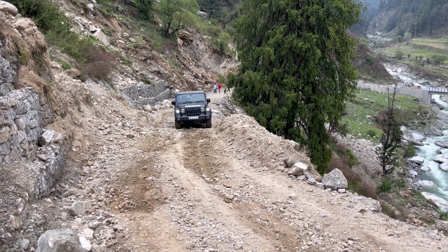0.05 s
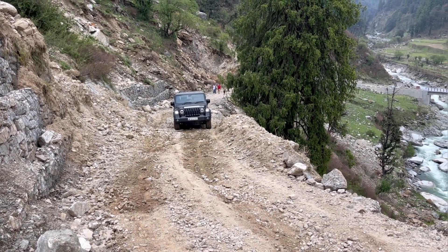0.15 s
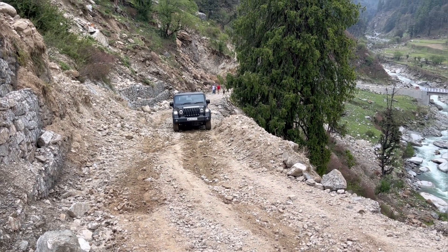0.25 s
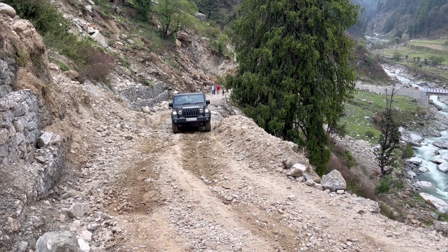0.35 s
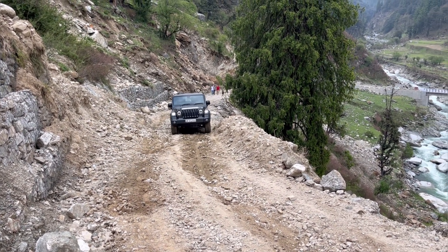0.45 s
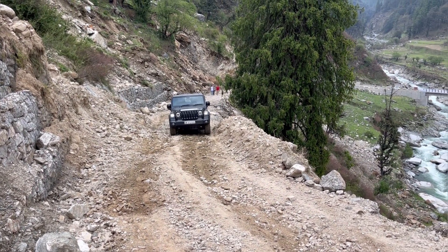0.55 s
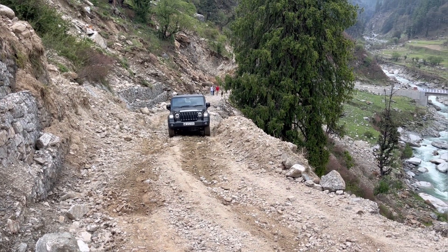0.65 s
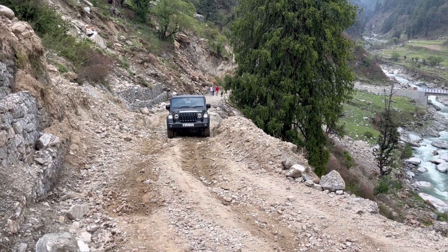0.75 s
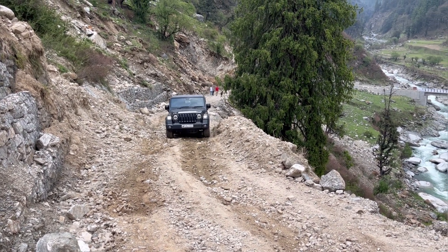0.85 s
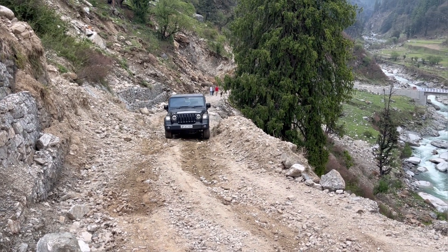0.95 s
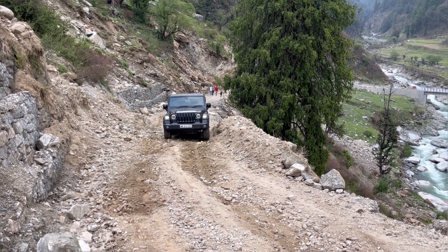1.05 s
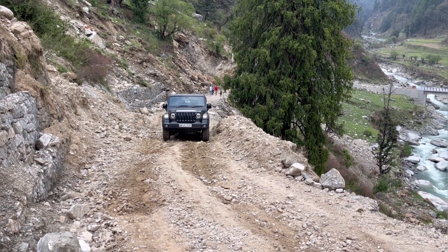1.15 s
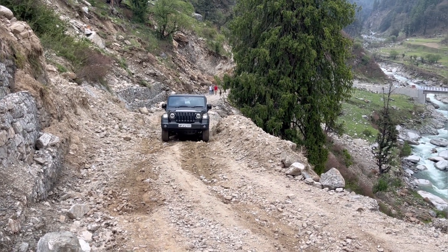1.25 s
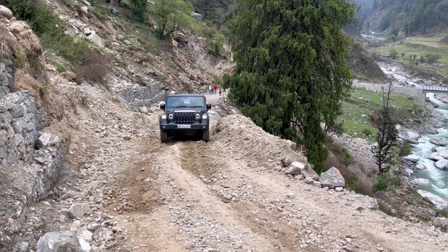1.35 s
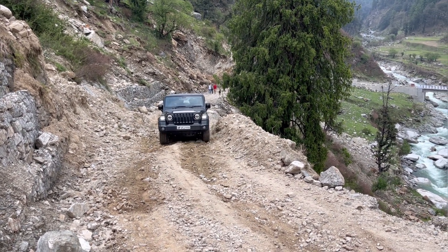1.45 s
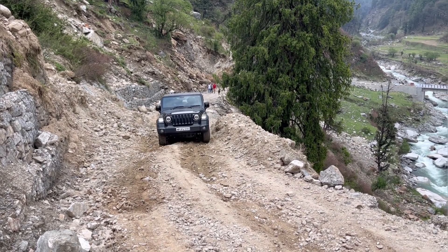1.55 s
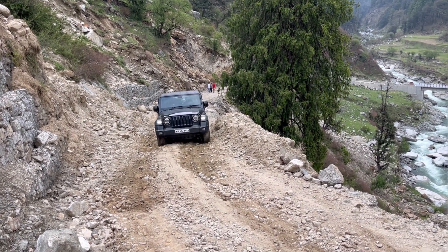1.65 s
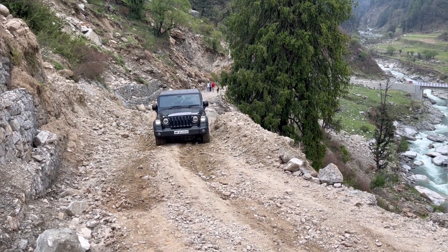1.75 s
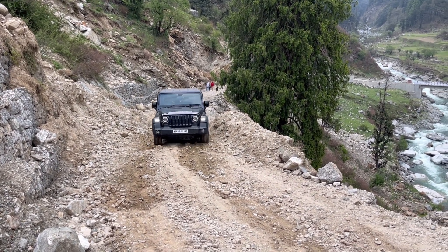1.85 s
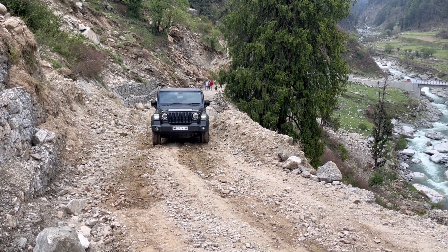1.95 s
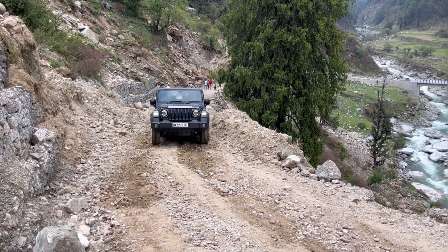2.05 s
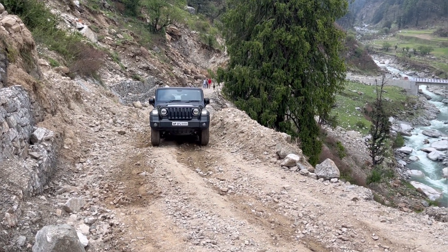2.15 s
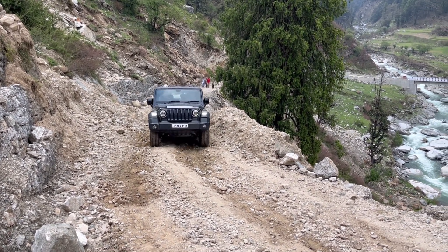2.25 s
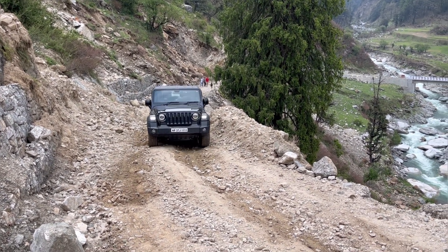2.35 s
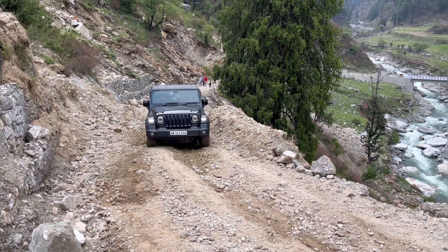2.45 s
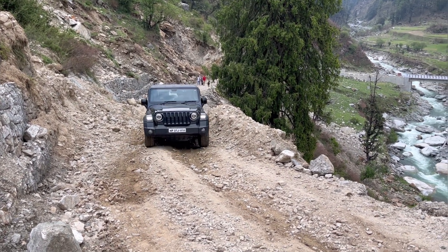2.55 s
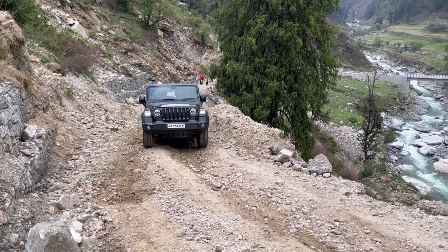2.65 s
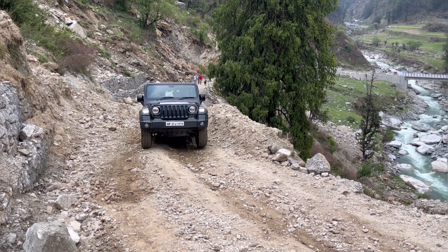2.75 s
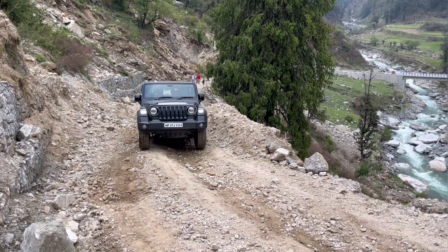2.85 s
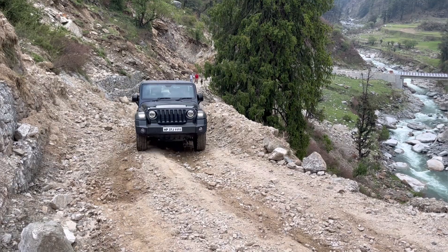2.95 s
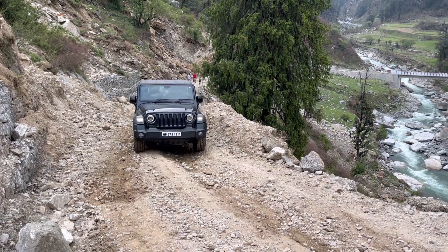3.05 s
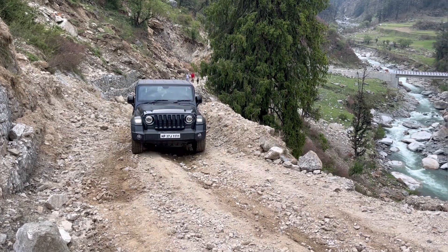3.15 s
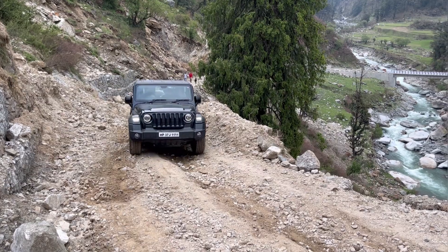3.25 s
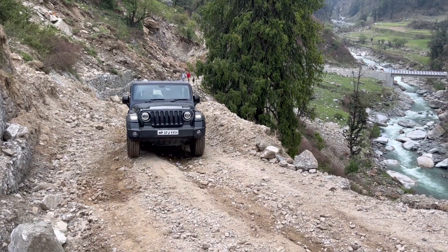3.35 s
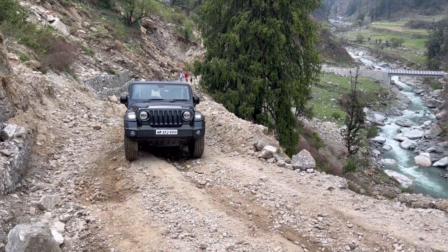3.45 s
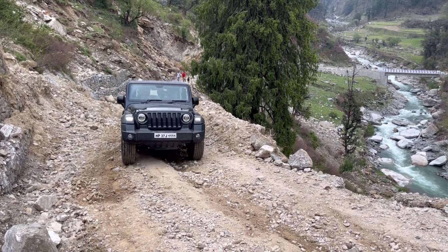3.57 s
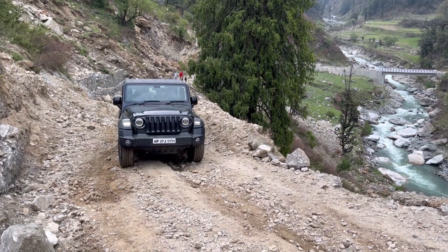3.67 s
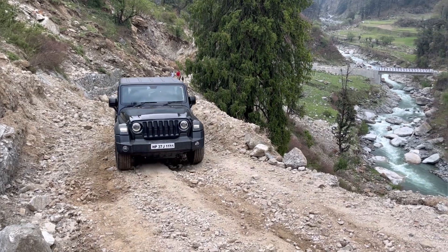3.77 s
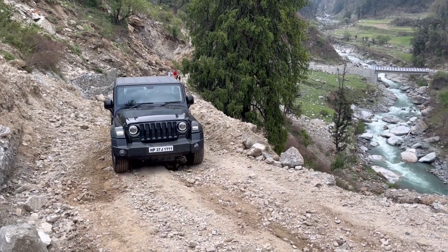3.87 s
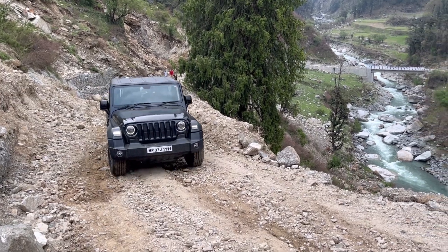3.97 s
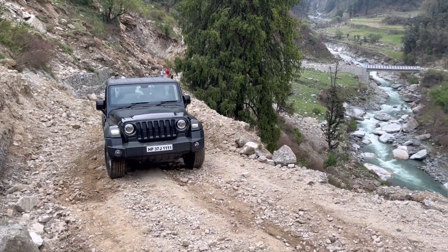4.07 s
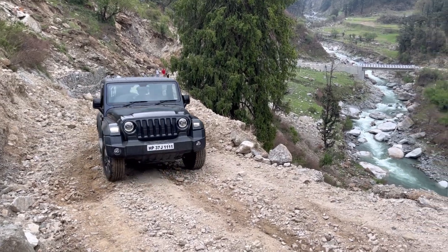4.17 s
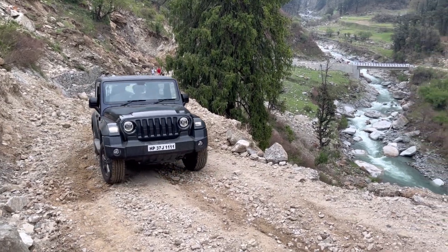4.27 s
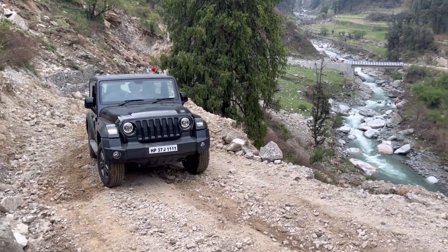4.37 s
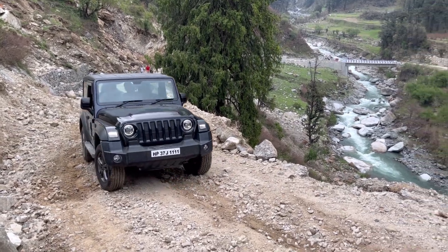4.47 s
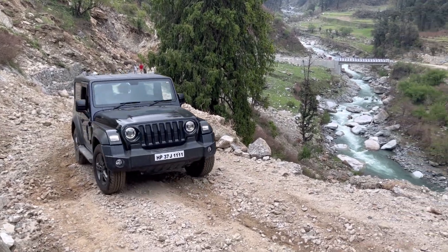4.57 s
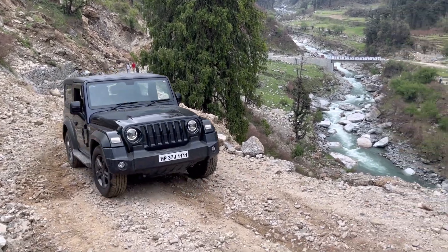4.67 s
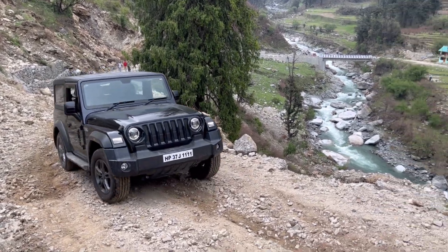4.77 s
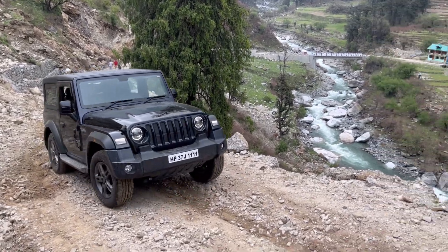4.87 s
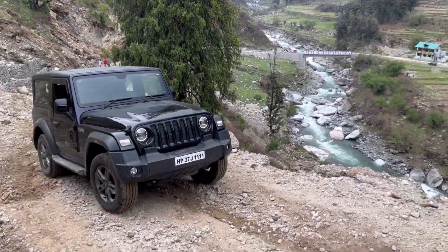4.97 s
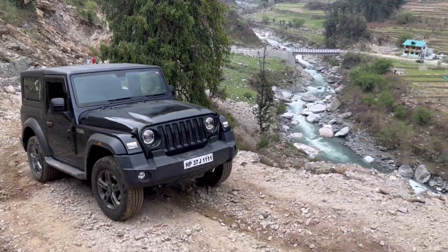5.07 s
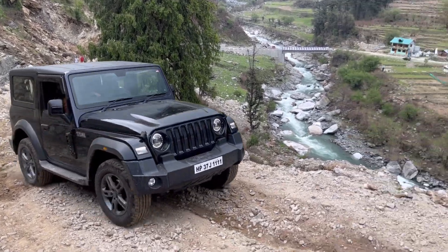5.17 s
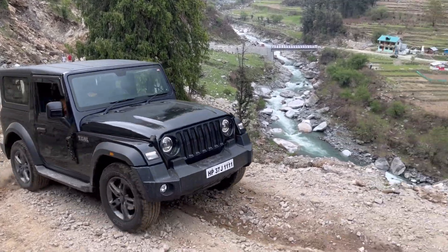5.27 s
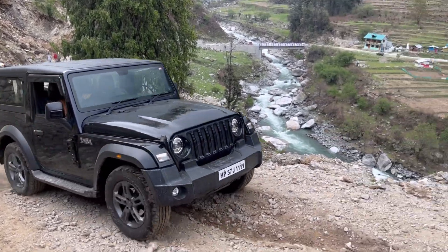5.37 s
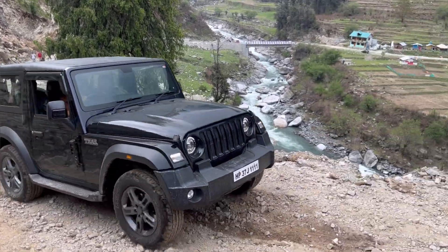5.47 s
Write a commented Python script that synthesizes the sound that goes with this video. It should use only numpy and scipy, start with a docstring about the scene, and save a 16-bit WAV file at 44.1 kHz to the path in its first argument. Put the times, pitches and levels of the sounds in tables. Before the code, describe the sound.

Low engine throb and clatter approach over rough ground beside rushing water, ending in close, dense gravel crunch, hollow stone knocks and sharp pebble snaps.

```python
"""A four-wheel-drive throbs at low revs as it crawls up a stony track towards the listener.
Its engine sums wavering exhaust partials, ringing block clatter, bright injector ticks and a faint turbo whistle.
Coloured showers of tiny impacts make wind and tyre rumble, crunching stones and grit; ringing modes make the
thumps and knocks, and resonant noise bursts the snaps.
A bird slurs once over a rushing river of filtered splashes; two closely spaced microphone ports pick it up."""
import sys
import numpy as np
from scipy import signal
from scipy.fft import rfft, irfft
from scipy.io import wavfile

SR = 44100
rng = np.random.default_rng(int(sys.argv[2]) if len(sys.argv) > 2 else 0)


def master(y):
    """Save y as 16-bit WAV."""
    cut = np.clip(np.atleast_2d(y).T, -1, 1)
    pcm = np.round(cut * 32767)  # scale
    wavfile.write(sys.argv[1], SR, pcm.astype(np.int16))


N = 243431
TIME = np.arange(N) / SR
FREQS = np.maximum(np.arange(N // 2 + 1) * SR / N, 1)

# large stones knocking against a tyre, levels before trim, pitch before random detuning:
# start_s, peak_db, hardness_tilt_db_per_octave, pitch_hz, ring_time_s
KNOCKS = [(0.029, -24.5, -20, 720, 0.075), (2.425, -22.5, 1, 447, 0.014), (2.906, -21.5, -15, 466, 0.031),
          (3.074, -17.5, -11, 439.7, 0.017), (3.108, -23.5, -23, 510, .04), (3.124, -13.5, -3, 454, 0.029),
          (3.144, -22, -26, 540, 0.071), (3.33, -20, -5, 506, 0.034), (3.363, -18.5, -8, 567, .025),
          (3.962, -19, -6, 444, 0.035), (4.036, -17, -8, 455.7, 0.085), (4.097, -18.5, -10, 455, 0.037),
          (4.072, -21, -15, 480, .06), (4.118, -18, -6, 442, 0.048), (4.1895, -11.5, -15, 400, .035),
          (4.352, -22, -12, 590, .03), (4.401, -8.5, -1.5, 452.5, 0.049), (4.411, -12.5, -12, 458.4, 0.033),
          (4.523, -16, -3, 455.5, 0.08), (4.566, -12.5, -12, 473, 0.014), (4.591, -18, -18, 453, 0.051),
          (4.608, -18, -8, 466, 0.066), (4.634, -18.5, -21, 436, 0.03), (4.758, -15, -33, 444, 0.059),
          (4.867, -10, -12, 607, 0.066), (4.882, -8, -2, 494, 0.038), (4.895, -13, -24, 500, 0.036),
          (4.969, -10.5, -4, 380, 0.061), (4.989, -10, -7, 470, 0.069), (5.004, -12, 0, 484, 0.041),
          (5.023, -8.5, -1, 430.5, 0.041), (5.052, -14.5, -14, 520, .06), (5.076, -11, -12, 442.5, 0.061),
          (5.091, -14, -16, 535, 0.057), (5.107, -13, -10, 420, 0.038), (5.117, -11, -12, 525, 0.054),
          (5.18, -12, -8, 525.5, 0.041), (5.192, -11.5, -12, 435.8, 0.045), (5.21, -10.5, -7, 455, 0.052),
          (5.223, -10, -6, 459, 0.11), (5.276, -11.5, -1, 410, 0.038), (5.25, -15, -12, 450, 0.055),
          (5.291, -13, -10, 480, 0.025), (5.312, -11, -6, 573, 0.035), (5.325, -14.5, 7, 456.4, .025),
          (5.348, -20, -10, 480, .05), (5.361, -18, -6, 639.4, .04), (5.396, -12, -15, 482, 0.03),
          (5.406, -13, -5, 526, 0.016), (5.458, -12.5, -14, 405, 0.023), (5.4747, -2.5, -14, 435, 0.029)]
# likeness of the two ports for sounds of the vehicle: frequency_hz, coherence (0-1)
NEAR_LIKENESS = [(60, .99), (200, .96), (600, .92), (850, .75), (1200, .35), (2000, .7), (5000, .65),
                 (7000, .72), (12000, .87)]

# steady approach; the vehicle would draw level at PASSES_S, and levels are given at NEAR_M
SPEED_M_S, PASSES_S, CLEARANCE_M, NEAR_M = 2.85, 5.87, 3.37, 4.1
CRUISE_HZ = 60  # firing rate at which levels are given


def undb(db):
    """Decibels to gain."""
    return 10 ** (np.asarray(db) / 20)


def in_time(table):
    """The columns of a curve at every sample."""
    s, *columns = np.transpose(table)
    return [np.interp(TIME, s, c) for c in columns]


def in_frequency(table, axis=1):
    """One column of a spectrum at every frequency, interpolated over log frequency."""
    rows = np.array(table, float)
    return np.interp(np.log(FREQS), np.log(rows[:, 0]), rows[:, axis])


def colour(x, spectrum):
    """Filter by a spectrum that falls a further 12 dB per octave beyond its ends."""
    low_skirt = np.minimum(FREQS / spectrum[0][0], 1)
    high_skirt = np.minimum(spectrum[-1][0] / FREQS, 1)
    gain = undb(in_frequency(spectrum)) * (low_skirt * high_skirt) ** 2
    return irfft(rfft(x) * gain, N)


def unit(x):
    """Scale to rms 1."""
    return x / np.sqrt(np.mean(x ** 2))


def walk(rate_hz):
    """A smooth random wander of rms 1, mostly slower than the given rate."""
    noise = rfft(rng.standard_normal(N))
    return unit(irfft(noise * np.exp(-(FREQS / rate_hz) ** 2), N))


def spread(pair, likeness):
    """Mix two unrelated sounds into left and right of a given coherence, at rms 1."""
    coherence = np.clip(in_frequency(likeness), 0, .999)
    mid = rfft(pair[0]) * np.sqrt(1 + coherence)
    side = rfft(pair[1]) * np.sqrt(1 - coherence)
    return unit(irfft(np.array([mid + side, mid - side]), N))


def impacts(per_s, scatter_db):
    """Two unrelated showers of tiny impacts; positive scatter makes a few strong, negative a few weak."""
    hit = rng.random((2, N)) < per_s / SR
    size = undb(scatter_db * np.minimum(rng.exponential(size=(2, N)), 4))
    return unit(hit * size * rng.choice([-1, 1], (2, N)))


def add(track, start_s, sound, db):
    """Mix a short sound into a track at a given peak level."""
    i = int(np.clip(start_s * SR, 0, N - 1))
    peaked = undb(db) * sound / np.abs(sound).max()
    track[i:i + len(sound)] += peaked[:N - i]


def remoteness():
    """Distance of the approaching vehicle, in doublings of the near distance."""
    along_m = SPEED_M_S * (TIME - PASSES_S)
    return np.log2(np.hypot(along_m, CLEARANCE_M) / NEAR_M)


def loudness(law, firing_hz):
    """Level of a part in dB: it grows as the vehicle nears and as the revs rise."""
    near_db, distance_db, revs_db = law
    return near_db - distance_db * remoteness() + revs_db * np.log2(firing_hz / CRUISE_HZ)


def exhaust(firing_hz, phase, db, boom_hz, boom_db, smoothing, flutter_db):
    """Exhaust pulses, rounded by the silencer to a few wavering partials that boom near its resonance."""
    # exhaust partials: multiple_of_firing_rate, level_db before boom and flutter
    partials = [(.5, -23), (1, -1), (1.5, -12.5), (2, -8.5), (2.5, -14), (3, -9.5)]

    def boom(hz):
        return boom_db * np.exp(-(np.log(hz / boom_hz) / 0.77) ** 2)

    tone = 0
    for order, part_db in partials:
        if order % 1:  # unequal cylinders add half orders, which fade as the tone grows louder than its median
            part_db = part_db - smoothing * np.maximum(db - np.median(db), 0)
        # the boom is taken relative to the firing tone
        part_db = part_db + boom(order * firing_hz) - boom(firing_hz)
        part_db = part_db + flutter_db * walk(24)
        tone = tone + undb(part_db) * np.sin(2 * np.pi * (order * phase + rng.random()))
    return np.sqrt(2) * tone * undb(db)


def clatter(phase, firing_hz, strain_db, sharpness):
    """Each firing shakes the block with a burst that rings in its resonances; the bonnet muffles the top."""
    # ringing of the engine block and its covers: frequency_hz, width_hz, level_db
    block = [(382, 44, 6), (623, 18, 2), (832, 77, -4), (1266, 144, -11.5), (1450, 83, -19),
             (2230, 1200, -20.5), (3710, 300, -22), (4440, 100, -21)]
    # clatter loudness: near_level_db at cruise, loss_db per distance doubling, gain_db per revs doubling
    clatter_law = (-38, 5.17, 13.5)
    bursts = impacts(per_s=6000, scatter_db=2.5) * np.exp(sharpness * np.cos(2 * np.pi * phase))
    ring = 0
    for hz, width_hz, mode_db in block:
        b, a = signal.iirpeak(hz, hz / width_hz, fs=SR)
        ring = ring + undb(mode_db) * signal.lfilter(b, a, bursts)
    muffled = colour(ring, [(250, 0), (4000, 0)])
    return spread(muffled, NEAR_LIKENESS) * undb(loudness(clatter_law, firing_hz) + strain_db)


def injectors(phase, decay_cycles, uneven_db):
    """Injectors tick as bright noise that jumps up and decays at each firing, at a wandering strength."""
    # level of the ticking: time_s, level_db
    ticking = [(0, -59), (1.3, -54.5), (1.9, -73), (2.3, -70), (2.45, -50.5), (3.2, -58.5), (4.1, -49),
               (5.52, -49)]
    # ringing of the injectors: frequency_hz, density_db per Hz
    injector_spectrum = [(2900, -9), (3300, -0.5), (3650, -2.5), (4100, -11), (5900, -22), (6500, -7),
                         (7200, -25)]
    level_db, = in_time(ticking)
    decay = np.exp(-(phase % 1) / decay_cycles)
    ticks = rng.standard_normal((2, N)) * decay * undb(uneven_db * walk(46))
    return spread(colour(ticks, injector_spectrum), NEAR_LIKENESS) * undb(level_db)


def whistle(table, waver, flicker_db):
    """A gliding sine, unsteady in pitch and level, silent outside its table."""
    hz, db = in_time(table)
    sounding = (TIME > table[0][0]) & (TIME < table[-1][0])
    cycles = np.cumsum(hz * (1 + waver * walk(202.6))) / SR
    return sounding * undb(db + flicker_db * walk(14)) * np.sin(2 * np.pi * cycles)


def turbo():
    """The turbocharger's faint whistle drifts in pitch."""
    # whistle before waver and flicker: time_s, pitch_hz, level_db
    turbo_glide = [(1.3, 11600, -80), (1.47, 11680, -72), (1.6, 11400, -79), (1.75, 11950, -80),
                   (1.88, 11620, -71), (2.05, 11720, -75), (2.27, 11130, -70.5), (2.42, 10880, -69.5),
                   (2.6, 11200, -76), (2.8, 12000, -86), (3.2, 13300, -75), (3.6, 13980, -85)]
    return whistle(turbo_glide, waver=.006, flicker_db=3.5)


def rumble(phase, firing_hz, strain_db, throb):
    """Gusting wind and dull jolts of tyres and body share one noise, shaken a little at each firing."""
    # rumble colour: frequency_hz, density_db per Hz
    rumble_spectrum = [(25, -10), (42, -5.5), (60, -2), (85, 5.5), (125, -6.5), (160, -3.5), (250, -14),
                       (370, -9), (480, -41), (900, -39)]
    # tyre loudness: near_level_db at cruise, loss_db per distance doubling, gain_db per revs doubling
    tyre_law = (-28, 5.1, 10.7)
    wind_db, gust_db = -40, 4.5
    tyre_db = loudness(tyre_law, firing_hz) + strain_db
    gain = np.hypot(undb(wind_db + gust_db * walk(6.2)), undb(tyre_db))
    jolts = impacts(per_s=900, scatter_db=2.5) * (1 + throb * np.cos(2 * np.pi * phase))
    return spread(colour(jolts, rumble_spectrum), NEAR_LIKENESS) * gain


def blow(modes, tilt_db, scrape, scrape_s):
    """A push and a short scrape ring modes of alternating sign; a harder contact lifts the upper ones."""
    t = TIME[:SR // 6]
    ring = 0
    for k, (hz, db, t60) in enumerate(modes):
        weight_db = db + tilt_db * np.log2(hz / modes[0][0]) + 0.5 * rng.standard_normal()
        detuned_hz = hz * (1 + 0.027 * rng.standard_normal())
        envelope = undb(weight_db - 60 * t / t60)
        ring = ring + (-1) ** k * envelope * np.sin(2 * np.pi * detuned_hz * t)
    push = scrape * rng.standard_normal(len(t)) * np.exp(-t / scrape_s)
    push[0] = 1
    return signal.fftconvolve(ring, push)[:len(t)]


def thumps(trim_db):
    """A wheel drops off a rock: tyre and body boom, deeper when the landing is soft."""
    # suspension jolts, levels before trim and bass cut: start_s, peak_db, hardness_tilt_db_per_octave
    landings = [(0.83, -25, -9), (0.869, -23.5, 18), (1.311, -21.5, 6), (1.683, -20, -3.5),
                (2.155, -16.5, -3), (2.285, -18, -25), (2.463, -23, -30), (2.651, -28, 27),
                (2.903, -21, -21), (3.011, -24, -5), (3.234, -27, 16), (3.335, -16.5, -10),
                (3.358, -27, -4), (4.191, -14, -2), (4.199, -19, 8), (4.21, -13, -13), (4.291, -22, -13),
                (4.902, -18, -8), (5.11, -16, -8), (5.217, -12.5, -2.5)]
    # modes of the body before random detuning: frequency_hz, level_db, t60_s
    body_modes = [(84, -1, 0.11), (148, -1, 0.08), (206, 0, 0.055), (290, 0, 0.065), (389, -4, 0.035)]
    out = np.zeros(N)
    for s, db, tilt_db in landings:
        add(out, s, blow(body_modes, tilt_db, scrape=0.03, scrape_s=0.0081), db + trim_db)
    # the lowest bass is cut away
    return signal.sosfilt(signal.butter(2, 55, "high", fs=SR, output="sos"), out)


def stirred(stir_db):
    """Gain of the ground's unrest, which swells into each knock and settles after it."""
    rise_s, settle_s = .006, .048
    gain = 0
    for s, db, *_ in KNOCKS:
        fade = np.maximum((s - TIME) / rise_s, (TIME - s) / settle_s)
        gain = gain + undb(db + stir_db) * np.exp(-fade)
    return gain


def sprayed():
    """Gain of the grit thrown by a slipping tread, which swells and dies away at each slip."""
    # sprays of grit: centre_s, level_db, length_s
    sprays = [(2.47, -59, 0.032), (3.33, -43.5, 0.032), (4.42, -53, 0.029), (4.611, -43, 0.011),
              (5.192, -38, 0.034)]
    return sum(undb(db) * np.exp(-((TIME - s) / length_s) ** 2) for s, db, length_s in sprays)


def gravel(crunch_db, crackle_db, patchy_db, grit_patchy_db):
    """Stones crunch unevenly while fine grit crackles between them; each knock stirs both."""
    # colour of the grinding stones: frequency_hz, density_db per Hz
    stone_spectrum = [(180, 2), (320, -2), (430, 0), (520, -1.5), (620, 4), (740, -1.5), (820, -2),
                      (1100, -20.5), (1400, -32), (3000, -35)]
    # colour of the fine grit: frequency_hz, density_db per Hz
    grit_spectrum = [(1100, 4.5), (1400, -6), (1700, 2), (2850, -3), (3300, -9), (3680, -3.5), (4000, -8.5),
                     (4400, -13), (4900, -8), (5500, -12), (7400, -9.5), (9300, -15.5), (11700, -15.5),
                     (14000, -28)]
    stones = spread(colour(impacts(per_s=380, scatter_db=-1.0), stone_spectrum), NEAR_LIKENESS)
    grit = spread(colour(impacts(per_s=4000, scatter_db=-1.0), grit_spectrum), NEAR_LIKENESS)
    # stirring levels are relative to the knocks as listed
    crunch = np.hypot(undb(crunch_db + patchy_db * walk(35)), stirred(stir_db=-22))
    crackle = np.hypot(undb(crackle_db + grit_patchy_db * walk(82)), stirred(stir_db=-35.5) + sprayed())
    return stones * crunch + grit * crackle


def knock(tilt_db, hz, ring_s):
    """One stone against the tread: its size sets the pitch, the grip of the rubber how long it rings."""
    # hollow ring of tyre and wheel arch, rescaled to each stone: frequency_hz, level_db, t60_s
    wheel_modes = [(446.5, 2.5, 0.034), (579, -2.5, 0.04), (790, -4, 0.05), (1119, -3.5, 0.045),
                   (1280, -12, 0.025), (1700, -20.5, 0.02)]
    lowest_hz, _, lowest_t60 = wheel_modes[0]
    modes = [(f * hz / lowest_hz, db, t60 * ring_s / lowest_t60) for f, db, t60 in wheel_modes]
    return blow(modes, tilt_db, scrape=.018, scrape_s=.18 * ring_s)


def knocks(trim_db):
    """Large stones tip under the tread and knock hollowly."""
    out = np.zeros(N)
    for s, db, tilt_db, hz, ring_s in KNOCKS:
        add(out, s, knock(tilt_db, hz, ring_s), db + trim_db)
    return out


def loose_stones(crunch_db):
    """Further stones of mixed size tip under the treads at random, with a common short ring, their levels
    following the crunch."""
    per_s, over_crunch_db, scatter_db = 32, 1.5, -14
    out = np.zeros(N)
    for when, size, hardness, pitch in rng.random((int(per_s * N / SR), 4)):
        i = int(when * N)
        sound = knock(-12 * hardness, hz=390 + 150 * pitch, ring_s=0.026)
        add(out, TIME[i], sound, crunch_db[i] + over_crunch_db + scatter_db * (2 * size - 1))
    return out


def snap(hz, decay_s, width):
    """A brief noise crack rings at the pebble's own pitch; width is a fraction of that pitch."""
    t = TIME[:SR // 30]
    crack = rng.standard_normal(len(t)) * t * np.exp(-t / decay_s)
    b, a = signal.iirpeak(hz, 1 / width, fs=SR)
    return signal.lfilter(b, a, signal.lfilter(b, a, crack))


def snaps(trim_db):
    """Pinched pebbles crack against each other."""
    # pebbles snapping, levels before trim: start_s, peak_db, pitch_hz
    pebbles = [(4.605, -34, 2400), (4.949, -30, 1714), (4.975, -26, 1650), (5.004, -24, 1710),
               (5.028, -25, 2050), (5.119, -29, 1650), (5.19, -32, 1930), (5.191, -19, 6270),
               (5.197, -29, 5200), (5.226, -31, 2100), (5.267, -22, 1780), (5.279, -23, 1897),
               (5.281, -26, 6440), (5.313, -25, 2090), (5.396, -37, 1797), (5.443, -14, 2380),
               (5.447, -21, 2700), (5.470, -16.5, 1900), (5.472, -20, 6900), (5.472, -34, 5030),
               (5.474, -24, 3340)]
    out = np.zeros(N)
    for s, db, hz in pebbles:
        add(out, s, snap(hz, decay_s=0.00098, width=0.43), db + trim_db)
    return out


def chips(grit_db):
    """Chips of stone crack thickly at random under the treads, their levels following the grit."""
    per_s, over_grit_db, scatter_db = 270, 0.5, -2.5
    low_hz, high_hz = 1590, 3940
    out = np.zeros(N)
    for when, size, pitch in rng.random((int(per_s * N / SR), 3)):
        i = int(when * N)
        sound = snap(low_hz * (high_hz / low_hz) ** pitch, decay_s=0.00073, width=0.63)
        add(out, TIME[i], sound, grit_db[i] + over_grit_db + scatter_db * (2 * size - 1))
    return out


def bird():
    """One bird call slurs quickly downwards."""
    # slur before waver and flicker: time_s, pitch_hz, level_db
    slur = [(3.40, 7020, -63), (3.412, 6210, -51), (3.425, 5140, -49.5), (3.445, 4300, -51),
            (3.465, 3780, -53), (3.48, 3600, -80)]
    return whistle(slur, waver=.012, flicker_db=1.5)


def river(level_db, surge_db, flicker_db):
    """White water far below: countless splashes; the whole surges slightly and each octave flickers alone."""
    # colour of the water: frequency_hz, density_db per Hz
    water_spectrum = [(150, 1), (370, -4), (500, -8.5), (1000, -12), (1550, -10.5), (2200, -19),
                      (2850, -21), (3150, -22), (3480, -20.5), (3850, -25.5), (4300, -26.5), (6000, -30),
                      (8700, -32), (10000, -35), (11700, -42.5), (14000, -56)]
    # likeness of the two ports for the river: frequency_hz, coherence (0-1)
    far_likeness = [(150, 0.89), (400, 0.68), (600, 0.15), (1200, 0.0084), (2300, 0.18), (3400, 0.15),
                    (5500, 0.13), (8000, 1), (12000, 1)]
    water = rfft(colour(impacts(per_s=12000, scatter_db=2.5), water_spectrum))
    octave = np.clip(np.log2(FREQS / water_spectrum[0][0]), 0, 6)
    flickering = 0
    for k in range(7):
        overlap = np.maximum(1 - np.abs(octave - k), 0)  # neighbouring bands crossfade
        flickering = flickering + irfft(water * overlap, N) * undb(flicker_db * walk(29))
    return spread(flickering * undb(surge_db * walk(17.0)), far_likeness) * undb(level_db)


def scene():
    """The vehicle and its wheels draw near over the steady river."""
    # engine: time_s, firing_rate_hz before its small wander, firing_tone_strength_db near by
    engine_course = [(0, 73.6, -22), (.05, 70.8, -16.5), (.14, 69.04, -31), (.33, 67, -23.5),
                     (.53, 66.5, -18), (.75, 66.3, -27.5), (1.1, 65.9, -28), (1.25, 74.55, -21.5),
                     (1.42, 64.06, -20), (1.58, 53.44, -23.5), (2.04, 53.03, -27.5), (2.38, 43.65, -38),
                     (2.72, 45.43, -31.5), (3.52, 46.55, -30.5), (3.78, 40.7, -36.5), (3.98, 49.1, -29),
                     (4.42, 53.58, -29.5), (4.65, 61.06, -24), (4.8, 66.4, -19), (4.84, 66.8, -32),
                     (4.93, 73.84, -21.5), (5.06, 75.95, -24), (5.18, 81.1, -20), (5.34, 80.3, -19),
                     (5.45, 75, -17), (5.52, 70.6, -21)]
    # strain of the climb, which lifts clatter and tyre rumble together: time_s, lift_db
    strain = [(0, -1), (.6, 1.5), (1.3, 2.5), (2.0, 4), (2.6, -3.5), (3.2, 4), (3.8, 0), (5.52, -1.5)]
    # crunch loudness: near_level_db at cruise, loss_db per distance doubling, gain_db per revs doubling
    crunch_law = (-34, 7.15, 2.8)
    # grit loudness: near_level_db at cruise, loss_db per distance doubling, gain_db per revs doubling
    grit_law = (-38.5, 10.9, 0.44)
    firing_hz, effort_db = in_time(engine_course)
    strain_db, = in_time(strain)
    phase = np.cumsum(firing_hz * (1 + 0.0086 * walk(21.6))) / SR  # in firings
    exhaust_db = effort_db - 6 * remoteness()
    crunch_db = loudness(crunch_law, firing_hz)
    grit_db = loudness(grit_law, firing_hz)

    motor = exhaust(firing_hz, phase, exhaust_db, boom_hz=75.0, boom_db=11.5, smoothing=0.28, flutter_db=0.64)
    motor = motor + clatter(phase, firing_hz, strain_db, sharpness=0.18)
    motor = motor + injectors(phase, decay_cycles=0.52, uneven_db=2.5) + turbo()
    body = rumble(phase, firing_hz, strain_db, throb=0.21) + thumps(trim_db=0.5)
    ground = gravel(crunch_db, grit_db, patchy_db=0.85, grit_patchy_db=2.0)
    stones = knocks(trim_db=-5.0) + loose_stones(crunch_db)
    pebbles = snaps(trim_db=-0.5) + chips(grit_db)
    water = river(level_db=-37.5, surge_db=0.18, flicker_db=1.65)
    return motor + body + ground + stones + pebbles + bird() + water


def record(dry):
    """The housing shades and delays each port differently; the top is cut off."""
    # the ports against each other: frequency_hz, left_minus_right_db, left_lead_rad
    port_differences = [(60, .7, 0), (200, 1, -.1), (420, .6, -.3), (850, 5, -1.1), (1450, -1, -.6),
                        (1800, 4.5, 0), (2900, 2, -1.5), (4400, 7, -.9), (6300, 3, 1.1), (8200, 0, 3.1),
                        (11000, 0, 5.9), (13000, 0, 6.3)]
    top_hz = 14200
    # each port takes half of the difference, in opposite senses
    half_gain = undb(in_frequency(port_differences) / 2)
    half = half_gain * np.exp(1j * in_frequency(port_differences, axis=2) / 2)
    responses = irfft(np.array([half, 1 / half]), N)
    responses = np.roll(responses, 256, axis=1)[:, :513]  # short filters centred on time zero
    ports = signal.fftconvolve(dry, responses, mode="same", axes=1)
    return signal.sosfilt(signal.ellip(8, .2, 80, top_hz, fs=SR, output="sos"), ports)


dry = scene()
out = record(dry)
master(out)
```